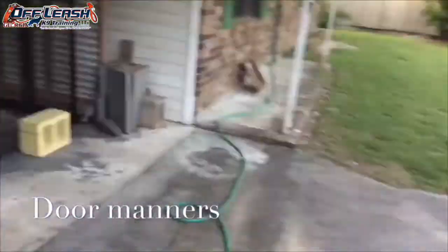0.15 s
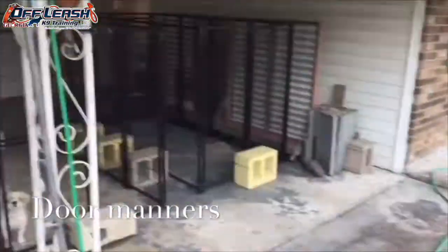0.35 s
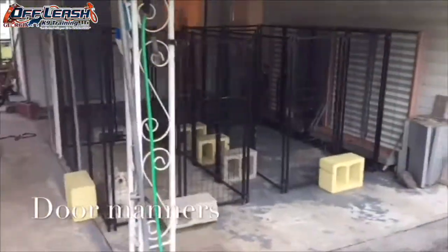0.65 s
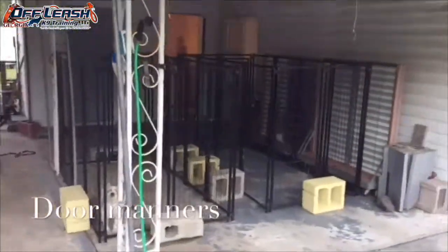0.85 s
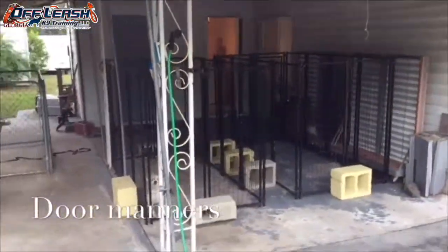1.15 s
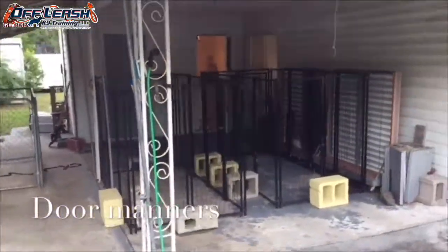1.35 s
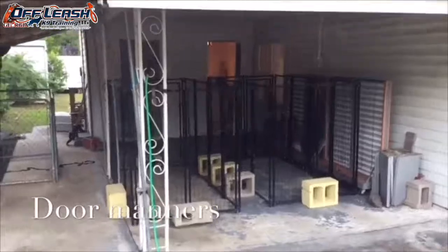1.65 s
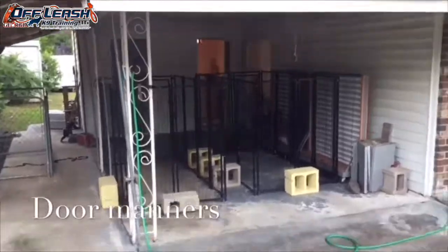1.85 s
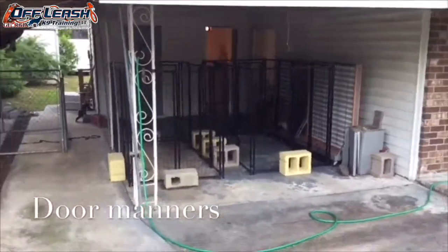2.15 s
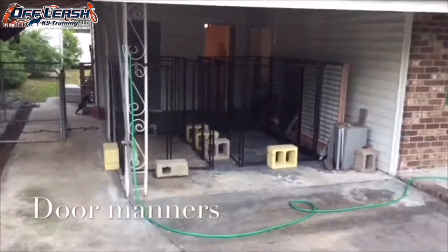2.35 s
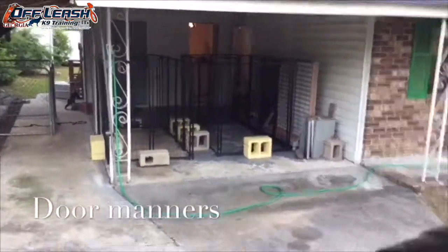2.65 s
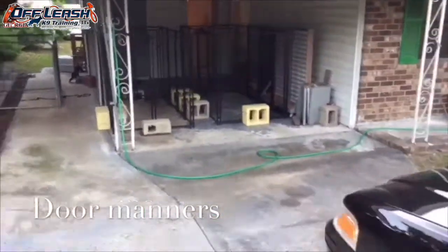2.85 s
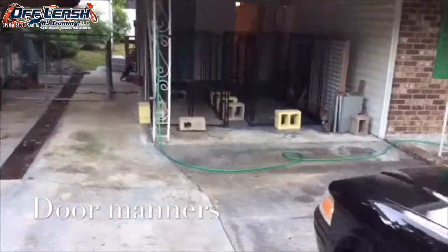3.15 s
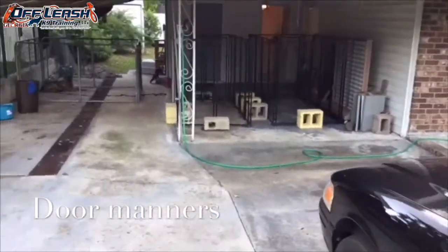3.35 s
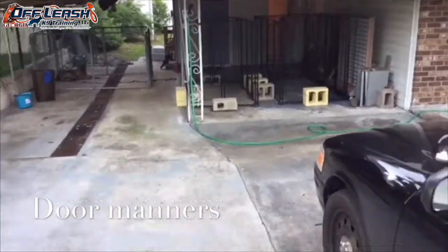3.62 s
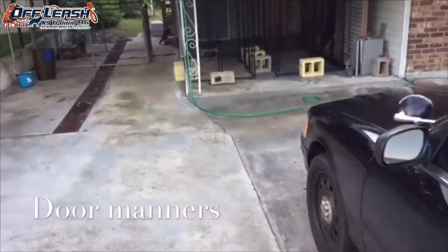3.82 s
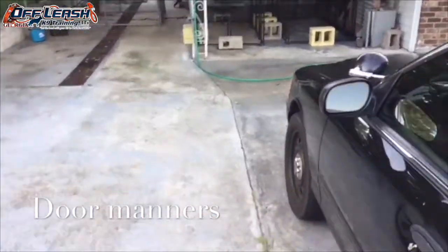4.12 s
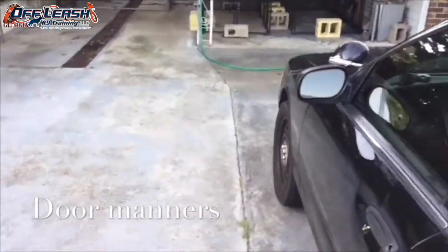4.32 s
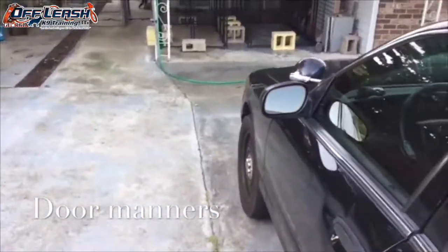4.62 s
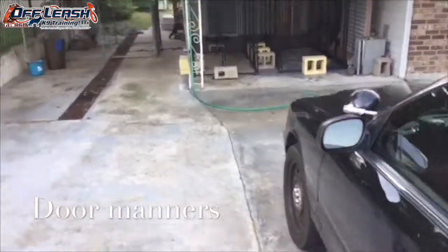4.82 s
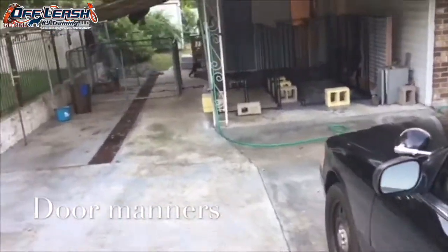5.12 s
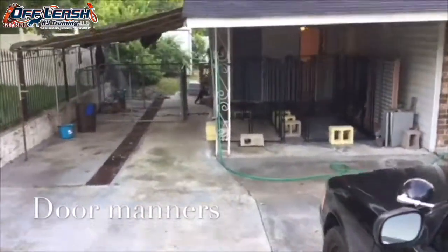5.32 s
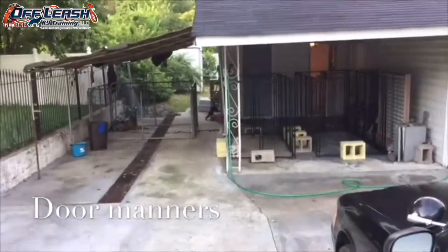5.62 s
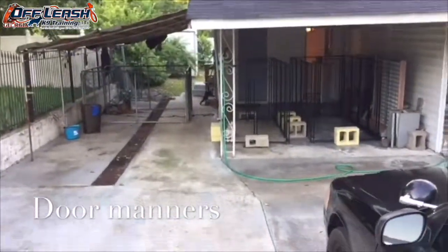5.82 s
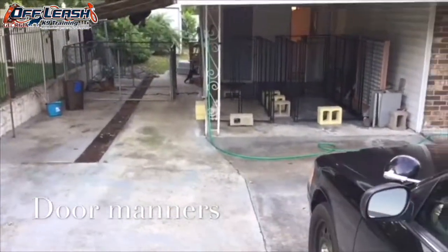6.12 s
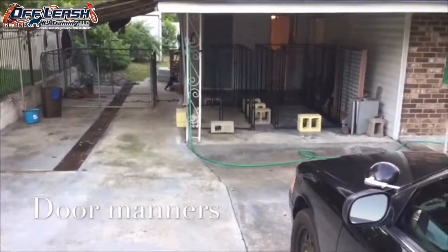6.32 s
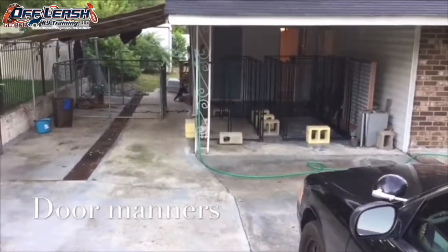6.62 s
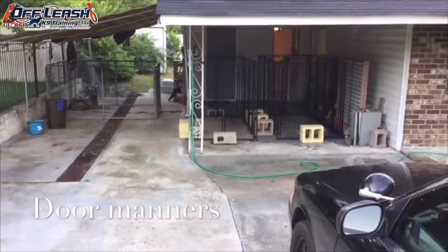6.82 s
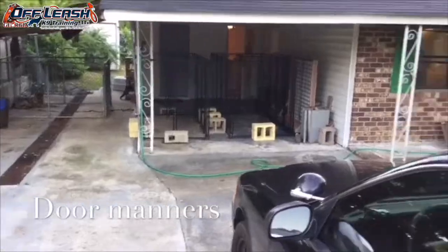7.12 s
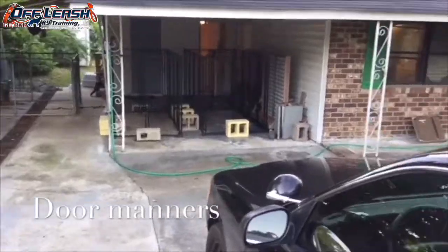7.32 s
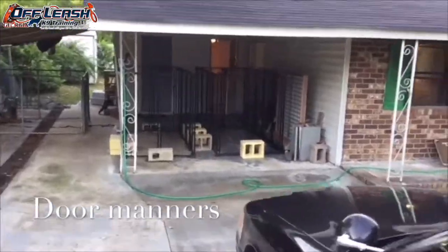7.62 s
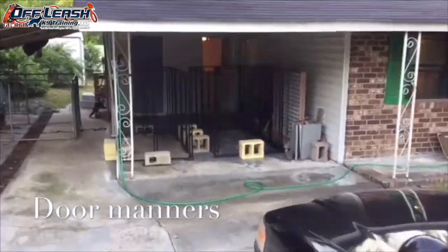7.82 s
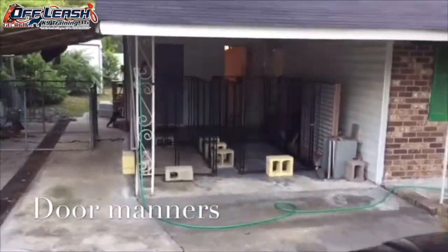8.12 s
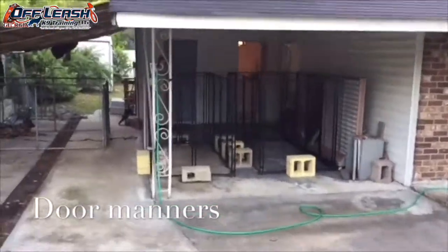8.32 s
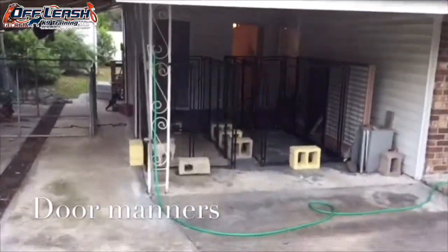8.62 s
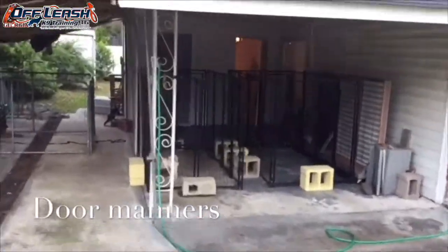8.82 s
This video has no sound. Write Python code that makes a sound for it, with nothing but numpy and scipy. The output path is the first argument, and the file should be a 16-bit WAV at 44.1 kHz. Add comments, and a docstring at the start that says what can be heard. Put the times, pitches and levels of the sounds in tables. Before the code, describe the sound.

Outdoors on a concrete driveway, close handheld microphone. Soft heel thuds, light sole taps and gritty scuffs over a faint low hum and hiss. At about four and a half seconds a car handle clacks, the latch cracks and the door opens with a knock. After a quiet gap of over two seconds the door slams, far louder, booming back off house and carport. Light steps resume.

```python
"""Driveway walk and car door slam

Handheld outdoors: the microphone walks down a concrete driveway to a parked car, over a low far hum.
Heels are sagging low sines with puffs of noise; soles tap and scuff as shaped, grainy noise.
Close by, the handle is pulled, the latch clacks and the door swings open with a knock: noise cracks,
dying modes and low pushes of air. Over two seconds later it is slammed, echoes built from decaying
noise throw the boom back from the yard, and the steps go on."""
import sys
import numpy as np
from scipy import signal
from scipy.fft import rfft, irfft, next_fast_len
from scipy.io import wavfile

SR = 44100
rng = np.random.default_rng(int(sys.argv[2]) if len(sys.argv) > 2 else 0)


def unload_wav(signal):
    """Save mono or channel-first audio to the path in sys.argv[1] as 16-bit WAV at rate SR, clipped to [-1, 1]."""
    wavfile.write(
        sys.argv[1],
        SR,
        np.round(np.clip(np.atleast_2d(signal).T, -1, 1) * 32767).astype(np.int16),
    )


N = 394959

# Spectra below are (frequency [Hz], density [dB per Hz]), relative: noise is brought to rms 1 afterwards.
# T60 is the time to fall 60 dB.

# far background, low hum: spectrum
HUM = [(18, -79.5), (30, -32), (96, -4.5), (188, -4), (337, -6), (372, -9), (400, -11.5), (468, -17),
       (509, -12.5), (697, -31.5), (900, -53), (1170, -38), (1980, -120)]
# hum over time, before a common lift: (time [s], level [dB])
HUM_LEVEL = [(0, -51.5), (.25, -52), (.45, -60.5), (.8, -58), (1.05, -56.5), (1.45, -58), (1.66, -60),
             (1.85, -58), (2.4, -58.5), (2.57, -59), (2.8, -57), (3.3, -61.5), (4.1, -57.5), (4.72, -52),
             (4.9, -52.5), (5.45, -57), (6.4, -54), (7.2, -55), (7.55, -51.5), (8.25, -57), (8.96, -55)]
# background hiss: spectrum
HISS = [(450, -3.5), (750, -0.5), (1050, 0.5), (1400, -3), (1900, -3), (2500, -7), (3500, -8.5), (4600, -9),
        (5000, -6.5), (5500, -10), (7300, -11), (8600, -16), (9600, -14.5), (10400, -6), (11000, -21),
        (12300, -17), (15500, -23.5)]
HISS_DB, HISS_RIPPLE_DB = -66, 2.4  # mean level, unevenness of its spectrum
# middle of the hiss, stirring unevenly: spectrum
STIR = [(300, -13), (700, -1.5), (1200, -5.5), (2000, -4), (2700, -14), (6000, -37)]
STIR_DB, STIR_SWELL_DB = -78, 4.5  # level, depth of each of its two swells
# faint whines: (mean frequency [Hz], mean level [dB])
WHINES = [(2692, -80.5), (2955, -79.5), (3300, -91.5), (3736, -82), (3880, -81.5), (4953, -82), (5820, -87),
          (7250, -89)]
WHINE_FADE_DB, WHINE_WAVER_HZ = 3.2, 34  # rms wander of level and pitch

# far-off peeps and low hoots: (middle [s], half length [s], pitch [Hz], level [dB])
PEEPS = [(.218, 0.012, 6460, -57), (1.277, 0.052, 350, -53), (1.416, 0.18, 345, -55.5),
         (2.083, 0.066, 2100, -65.5), (2.634, 0.055, 3840, -69)]
PEEP_FLUTTER_DB = 3

# ring of a small piece of metal: (frequency [Hz], level [dB], T60 [s])
PING = [(2980, -15, 0.36), (9900, -15, 0.13), (12600, -5, 0.16)]
PING_S, PING_DB = 0.397, -48.5
# small spring flicking in the open door: (frequency [Hz], level [dB], T60 [s])
SPRING = [(2550, -1, 0.023), (3590, 1, 0.057), (4750, 4.5, 0.043), (5830, 2, 0.05), (8150, 4, 0.036),
          (9640, 12, 0.011), (12230, 7, 0.025), (12600, -18, .22)]
# clatter of that spring: spectrum
CLATTER = [(800, -20), (1700, -23), (2400, 6.5), (4000, 1), (6000, 2), (7000, -4), (9500, 4), (12500, -14),
           (15000, -25)]
SPRING_S, SPRING_DB, CLATTER_DB = 5.0463, -42, -33

# soles, sleeves and door seals sliding:
# (middle [s], half length [s], rub level [dB], rub pitch [Hz], grit level [dB])
SCUFFS = [(0.057, 0.083, -64.5, 1480, -88), (0.227, 0.08, -57, 1690, -78), (0.604, 0.037, -57, 1950, -58),
          (0.945, 0.021, -57, 750, -65), (1.37, 0.056, -74, 1300, -79), (2.294, 0.02, -62, 565, -66.5),
          (2.654, 0.05, -61.5, 1600, -66), (2.748, 0.052, -69, 1810, -70), (3.514, 0.061, -69, 910, -67.5),
          (4.451, 0.034, -49.5, 1810, -60), (4.496, 0.04, -36.5, 362, -78), (4.514, 0.0037, -58, 1400, -52),
          (4.573, 0.019, -37, 630, -52), (4.641, 0.012, -50.5, 1420, -69), (4.807, 0.018, -37.5, 205, -52),
          (4.88, 0.017, -36.5, 297, -59), (5.044, 0.0047, -60, 2000, -43.5), (5.248, 0.024, -57, 1400, -60),
          (7.314, 0.0044, -45.5, 280, -43.5), (8.098, 0.11, -64, 650, -71.5),
          (8.683, 0.75, -70.5, 920, -71)]
# grit: spectrum
GRIT = [(600, -12.5), (2000, 3.5), (5000, 0.5), (9000, -8), (15000, -12.5)]
GRIT_SPREAD_DB = 4.2  # how much the grains differ in size

# grit snapping under the sole: (time [s], level [dB])
SNAPS = [(0.584, -37.5), (4.279, -47), (5.265, -45.5), (7.158, -42.5), (7.165, -46.5), (7.626, -53)]
# every snap: spectrum
SNAP = [(500, 1.5), (1100, -11), (1750, 1.5), (2800, -12), (4000, -11), (4500, -18), (5100, -12.5),
        (6500, -28), (12000, -37)]
SNAP_T60 = 0.018  # s

# heels landing on concrete: (time [s], relative level [dB])
HEELS = [(0.686, -36.5), (0.966, -21.5), (1.144, -26.5), (1.905, -30.5), (1.935, -23.5), (2.127, -34),
         (2.335, -23), (2.911, -30), (3.748, -30.5), (3.806, -28), (4.012, -45), (4.954, -34)]
# a harder landing sounds higher: pitch at the reference level, and its rise with level
HEEL_HZ, HEEL_REF_DB, HEEL_OCTAVES_PER_DB = 119.4, -24, 0.1945
HEEL_T60, HEEL_THIN_HZ = 0.035, 60.4  # s; bass thins out below
# rough puff of heel rubber: spectrum
PUFF = [(80, -41), (200, 7), (400, -1), (600, -15), (1200, -31.5), (3000, -45)]
PUFF_DB, PUFF_T60 = -18, 0.073  # against the level in HEELS; s
# weight settling onto the foot: delay (s), pitch, level against HEELS, T60 (s)
SETTLE_S, SETTLE_HZ, SETTLE_DB, SETTLE_T60 = 0.0149, 93, -8.5, 0.078

# clearer taps of soles on concrete:
# (time [s], knock level [dB], click level [dB], knock pitch [Hz], T60 [s])
TAPS = [(0.025, -41, -42, 704, 0.028), (0.355, -51.5, -49, 606, 0.037), (0.935, -40, -64, 420, 0.031),
        (1.229, -50, -50, 550, 0.031), (1.371, -51, -51.5, 590, 0.055), (1.83, -47.5, -67, 438, 0.06),
        (1.845, -45, -57, 398, 0.059), (2.289, -54, -56, 560, 0.14), (2.386, -46, -57, 400, 0.07),
        (2.6308, -43, -47.5, 615, 0.11), (2.647, -37.5, -54, 516, 0.078), (2.746, -51, -54, 497, 0.032),
        (2.765, -42.5, -68, 670, 0.02), (3.062, -42, -56, 540, 0.074), (3.101, -48, -56, 514, 0.045),
        (3.189, -44.5, -53, 450, 0.032), (3.433, -57, -58, 496, 0.057), (3.510, -45.5, -57, 470, 0.059),
        (3.53, -57, -58, 520, 0.052), (4.012, -33, -56, 485, 0.032), (4.046, -39, -58, 610, 0.031),
        (5.119, -43, -61, 380, 0.11), (5.263, -41, -50, 502, 0.058), (7.202, -38.5, -49, 566, 0.043),
        (7.714, -42, -51.5, 566, 0.037), (7.793, -61, -52.5, 600, .035), (8.018, -45, -62, 554, 0.025),
        (8.098, -42.5, -63, 640, 0.041), (8.137, -43, -52, 546, 0.04), (8.489, -35.5, -50, 526, 0.036),
        (8.639, -50, -50.5, 550, 0.032), (8.702, -49, -46, 560, 0.029), (8.718, -44.5, -66, 593, 0.029)]
# click of a sole: spectrum
SOLE = [(400, -8), (900, 3.5), (1600, 2.5), (2100, -5), (2600, -15), (4500, -30), (8000, -39), (15000, -54)]
CRUNCH_DB = 3  # unevenness of the grains in a tap
# one step clopping twice, hollow: (time [s], level [dB], pitch [Hz], T60 [s])
CLOPS = [(2.632, -25.5, 510, 0.048), (2.6475, -25.5, 460, .028)]
# stretches of walking: (start [s], end [s])
WALKS = [(0, 4.4), (7.7, 8.9)]
# faint taps falling by chance: rate, mean levels, largest departure either way
FAINT_PER_S, FAINT_KNOCK_DB, FAINT_CLICK_DB, FAINT_SPREAD_DB = 5, -56, -67, 3
FAINT_HZ, FAINT_T60 = 485, 0.14

# door handle hitting its stops: (time [s], level [dB])
CLACKS = [(4.5145, -26.5), (4.523, -37), (4.5601, -32)]
# ring of the handle: (frequency [Hz], level [dB], T60 [s])
HANDLE = [(763, -7.5, 0.043), (1100, -6, 0.041), (1840, -2, 0.046), (2154, -5, 0.055), (2430, -7.5, 0.049),
          (3580, -12.5, 0.049)]
BUZZ_DB = 4

# steel of handle and latch striking, from the pull through the opening to the slam:
# (time [s], crack level [dB], treble level [dB], T60 [s], thin below [Hz], dull above [Hz], rods level [dB])
LATCH = [ (4.45, -52, -47, 0.033, 900, 5000, -78), (4.464, -41, -45.5, 0.038, 696, 2500, -73),
         (4.5133, -29, -34, 0.053, 400, 3500, -50), (4.54, -41, -52, .05, 700, 3500, -62),
         (4.5585, -28, -52, 0.024, 700, 1700, -56), (4.571, -34, -46, .015, 500, 2500, -65),
         (4.578, -32.5, -36, 0.04, 2190, 9000, -56), (4.785, -41.5, -36, 0.038, 1400, 5000, -57),
         (4.8001, -43, -38, 0.057, 1200, 8000, -67), (4.808, -35, -36, 0.041, 1800, 8000, -64),
         (4.8128, -13, -35, 0.019, 347, 7000, -55), (4.8142, -11, -26, 0.012, 2420, 9000, -58),
         (4.878, -45, -73, .04, 1500, 7000, -63), (4.919, -48, -50, 0.024, 1400, 7000, -74),
         (5.046, -30, -32, 0.0076, 600, 4000, -64), (7.3185, -17, -21, 0.12, 400, 3500, -33.5),
         (7.3241, -19, -24, 0.025, 400, 5000, -40), (7.3280, -5.5, -20.5, 0.031, 250, 2600, -29.5),
         (7.3455, -34, -26, 0.053, 500, 6000, -52), (7.362, -31.5, -39.5, 0.2, 400, 4000, -54)]
# body of a latch crack: spectrum
STEEL = [(200, -7), (700, 5.5), (1300, -3), (2100, -2), (2800, -6), (3600, -7.5), (4800, -20.5),
         (7000, -30), (12000, -54)]
# treble of a latch crack: spectrum
STEEL_TREBLE = [(2000, -35), (4000, 1), (5600, 3), (9000, -0.5), (11500, -2), (15000, -2.5)]
# ring of latch and rods: (frequency [Hz], mean level [dB], T60 [s])
RODS = [(1070, -4.5, 0.13), (1220, -1.5, 0.129), (1310, -5, 0.156), (1430, -2, 0.15), (1501, 6.5, 0.12),
        (1665, 3, 0.13), (1710, -2, 0.14), (1870, -3.5, 0.086), (1980, -1, 0.15), (2167, -0.5, 0.18),
        (2380, -1.5, 0.12), (2930, 4.5, 0.12), (3450, -16, 0.1), (3710, -3, 0.12), (4680, -14, 0.18)]
RODS_SPREAD_DB, TREBLE_RIPPLE_DB = 1.5, 3  # variation per strike, unevenness of the treble
CRACK_RISE_S, RATTLE_DB, RATTLE_T60 = 0.0015, -31, 0.15  # rise, then the lingering rattle
CHATTER_PER_S, CHATTER_DB = 650, 2.5

# blows on the door: (time [s], panel level [dB], trim level [dB], trim T60 [s], dull above [Hz])
BLOWS = [(4.5139, -23.5, -24.5, 0.16, 400), (4.5246, -24, -23, 0.067, 450), (4.56, -39, -40, 0.051, 1500),
         (4.569, -33.5, -40, .04, 1200), (4.8150, -6.5, -16, 0.11, 806), (4.882, -38, -32, .04, 500),
         (7.319, -44, -25, 0.28, 3000), (7.328, -12.5, -10.5, 0.11, 2200), (7.381, -30, -31, 0.22, 700)]
# door panel modes: (frequency [Hz], level [dB], nominal T60 [s], split into a short and a long decay)
PANEL = [(193.4, -2, 0.095), (243.5, 4, 0.097), (322.5, -13.5, 0.11), (377, -5, 0.078), (416, 4, 0.078),
         (477.3, -6, 0.13), (542, -9.5, 0.055), (633, -7, 0.11), (694, -21.5, 0.26), (738, -19, 0.097),
         (890, -12, 0.086), (1062, -10.5, 0.077), (1195, -23, 0.039), (1495, -18, 0.075)]
# loose trim and glass: spectrum
TRIM = [(60, -15), (150, -5), (310, 8), (560, 2.5), (900, -9), (2000, -14), (3500, -18), (7000, -11.5),
        (15000, -36.5)]
TRIM_RIPPLE_DB = 4
# whole door heaving and pushing the cabin air: (time [s], level [dB], pitch [Hz], T60 [s])
BOOMS = [(4.5139, -11.5, 211.5, 0.057), (4.517, -20, 454, 0.031), (4.5245, -22, 198, 0.029),
         (4.8158, -17, 229, 0.054), (4.8165, -10.5, 457, 0.044), (4.838, -30, 147, .06),
         (7.329, -6, 317.5, 0.057), (7.3276, -6.5, 515, 0.036), (7.3316, 0, 180, 0.028),
         (7.337, -6, 88, 0.096), (7.3791, -11, 104, 0.069)]

# decay of the echo off house and carport: (frequency [Hz], T60 [s])
YARD_T60 = [(80, 0.85), (280, 0.5), (600, 0.5), (2000, 2), (12000, 3)]
# strength of that echo: (frequency [Hz], level [dB])
YARD_DB = [(80, -21.5), (160, -11.5), (290, -7.5), (450, -18.5), (700, -28), (2500, -23), (12000, -25.5)]
# answer of a far wall: spectrum
FAR = [(60, -30), (110, -10.5), (180, -13), (280, 9), (370, -3), (450, -14), (600, -21), (2000, -52.5)]
FAR_S, FAR_SPREAD_S, FAR_DB = 0.22, 0.077, -44  # delay, blur, level
# share of the door's sound that reaches the yard before and from SLAM_FROM_S
OPENING_SHARE, SLAM_SHARE, SLAM_FROM_S = 0.091, 0.98, 7
EDGE_HZ = 15900  # upper edge of the sound


def amp(db):
    """Decibels to gain."""
    return 10 ** (np.asarray(db) / 20)


def unit(x):
    """Scales to rms 1."""
    return x / np.sqrt(np.mean(x ** 2) + 1e-20)


def read(points, hz):
    """Reads a table on a log-frequency axis."""
    f, value = np.transpose(points)
    return np.interp(np.log(hz + 1), np.log(f + 1), value)


def add(mix, s, sound):
    """Mixes a sound in at second s, cropped to the ends of the mix."""
    start = round(s * SR)
    sound = sound[max(-start, 0):]
    part = mix[max(start, 0):][:len(sound)]
    part += sound[:len(part)]


def fade(t, t60):
    """Exponential decay of 60 dB in t60 seconds, never faster than 3 ms."""
    return np.exp(-np.log(1000) * t / np.maximum(t60, .003))


def colour(x, points, dull_hz=SR, ripple_db=0):
    """Gives x a spectrum, dull above dull_hz and randomly uneven in fine steps of frequency, at rms 1."""
    size = next_fast_len(len(x), True)
    hz = np.fft.rfftfreq(size, 1 / SR)
    grid = np.arange(0, SR, 45)
    ripple = ripple_db * np.interp(hz, grid, rng.standard_normal(len(grid)))
    ripple *= hz / (hz + 800)  # the bass stays smooth
    gain = amp(read(points, hz) + ripple) / np.hypot(1, hz / dull_hz)
    return unit(irfft(rfft(x, size) * gain, size)[:len(x)])


def noise(points, size=SR // 2, dull_hz=SR, ripple_db=0):
    """Coloured noise at rms 1."""
    return colour(rng.standard_normal(size), points, dull_hz, ripple_db)


def struck(x, envelope):
    """Shapes x with an envelope; the blow keeps the envelope's energy."""
    return unit(x * envelope) * np.sqrt(np.mean(envelope ** 2))


def drift(per_s, size=N):
    """Slow random wander at rms 1, through per_s random points a second."""
    knots = rng.standard_normal(size // 40)
    return unit(np.interp(np.arange(size) * per_s / SR, np.arange(len(knots)), knots))


def thud(hz, t60, rise, sag):
    """A soft push: a few low cycles whose pitch sags to hz as the contact spreads."""
    t = np.arange(SR // 2) / SR
    turns = hz * (t + sag * 0.0037 * (1 - np.exp(-t / 0.0016)))
    return np.sin(2 * np.pi * turns) * (1 - np.exp(-(t / rise) ** 2)) * fade(t, t60)


def ring(modes):
    """Dying sines of an object struck once, alternating in sign."""
    t = np.arange(SR // 2) / SR
    return sum((-1) ** k * amp(db) * np.sin(2 * np.pi * hz * t) * fade(t, t60)
               for k, (hz, db, t60) in enumerate(modes))


def background():
    """A low hum whose bands swell apart, hiss that stirs in the middle, and whines that come and go."""
    t = np.arange(N) / SR
    low = noise(HUM + [(1500, -68.5), (4000, -100)], size=N)
    deep = signal.sosfiltfilt(signal.butter(2, 200, fs=SR, output="sos"), low)
    upper_swell = amp(0.53 * drift(7.6) + 2.0 * drift(30) - 0.4)
    hum = 0.86 * deep * amp(3.0 * drift(25)) + (low - deep) * upper_swell
    hum *= amp(np.interp(t, *np.transpose(HUM_LEVEL)) + 1.8)
    hiss = noise(HISS, size=N, ripple_db=HISS_RIPPLE_DB) * amp(HISS_DB + 1.2 * drift(3.4))
    stir = noise(STIR, size=N) * amp(STIR_DB + STIR_SWELL_DB * (drift(8.1) + drift(40)))
    whines = np.zeros(N)
    for hz, db in WHINES:
        level = amp(db + WHINE_FADE_DB * drift(26))
        turns = np.cumsum(hz + WHINE_WAVER_HZ * drift(120)) / SR
        whines += level * np.sin(2 * np.pi * turns)
    return hum + hiss + stir + whines


def peeps():
    """Short, hoarse whistles from far off: sines that waver in pitch and strength."""
    out, t = np.zeros(N), np.arange(-SR // 2, SR // 2) / SR
    for s, half, hz, db in PEEPS:
        turns = np.cumsum(hz * (1 + 0.028 * drift(500, size=len(t)))) / SR
        flutter = unit(amp(PEEP_FLUTTER_DB * drift(44.5, size=len(t))))
        swell = np.exp(-(t / half) ** 2)
        add(out, s + t[0], amp(db) * flutter * swell * np.sin(2 * np.pi * turns))
    return out


def trinkets():
    """A thin ping of metal, and a spring in the open door that rings and clatters at once."""
    out, t = np.zeros(N), np.arange(SR // 2) / SR
    add(out, PING_S, amp(PING_DB) * ring(PING))
    envelope = fade(t, 0.039) + amp(-20.5) * fade(t, 0.29)
    envelope = envelope * amp(2.2 * drift(870, size=len(t)))
    clatter = struck(noise(CLATTER, ripple_db=-2.0), envelope)
    add(out, SPRING_S, amp(SPRING_DB) * ring(SPRING) + amp(CLATTER_DB) * clatter)
    return out


def scuffs():
    """Sliding contact: a hollow rub, and grains of sand of very uneven size."""
    out, t = np.zeros(N), np.arange(-SR // 3, SR // 3) / SR
    for s, half, rub_db, hz, grit_db in SCUFFS:
        sizes = amp(GRIT_SPREAD_DB * drift(700, size=len(t)))
        grains = colour(rng.standard_normal(len(t)) * sizes, GRIT, ripple_db=-3.5)
        hollow = [(hz / 5, -16), (hz / 3.46, -5), (hz, 0), (hz * 1.57, -14), (hz * 4, -34), (hz * 15, -54)]
        rub = noise(hollow, size=len(t), ripple_db=0.5) * amp(2.3 * drift(191.5, size=len(t)))
        slide = (amp(rub_db) * rub + amp(grit_db) * grains) * np.exp(-(t / half) ** 2)
        add(out, s + t[0], slide)
    return out


def snaps():
    """Grit breaking under a sole: one very short, dry click of noise each."""
    out, t = np.zeros(N), np.arange(SR // 8) / SR
    for s, db in SNAPS:
        snap = struck(noise(SNAP, size=len(t), ripple_db=1), fade(t, SNAP_T60))
        add(out, s, amp(db) * snap)
    return out


def heels():
    """Each heel thuds, higher when it lands harder, with a puff of rubber; then the weight settles."""
    out, t = np.zeros(N), np.arange(SR // 4) / SR
    for s, db in HEELS:
        hz = HEEL_HZ * 2 ** (HEEL_OCTAVES_PER_DB * (db - HEEL_REF_DB))
        add(out, s, amp(db + 6.5) * thud(hz, HEEL_T60, rise=0.0032, sag=0.53))
        envelope = fade(t, PUFF_T60) * (1 - np.exp(-t / 0.0041))
        puff = struck(noise(PUFF, size=len(t), ripple_db=4), envelope)
        add(out, s, amp(db + PUFF_DB) * puff)
        settle = thud(SETTLE_HZ, SETTLE_T60, rise=0.0061, sag=0.08)
        add(out, s + SETTLE_S, amp(db + SETTLE_DB) * settle)
    return signal.sosfilt(signal.butter(1, HEEL_THIN_HZ, "high", fs=SR, output="sos"), out)


def tap(knock_db, click_db, hz, t60):
    """A sole taps: a short hollow knock of noise with a grainy crunch on top."""
    size = SR // 8
    t = np.arange(size) / SR
    hollow = [(hz / 6, -22), (hz / 1.28, -8), (hz, 0), (hz * 0.99, -7), (hz * 1.96, -28), (hz * 10, -70)]
    soft = 1 - np.exp(-(t / 0.0011) ** 2)  # rubber takes a moment to load
    knock = struck(noise(hollow, size=size, ripple_db=6.5), fade(t, t60) * soft)
    grains = fade(t, t60) * soft * amp(CRUNCH_DB * drift(380, size=size))
    crunch = colour(grains * rng.standard_normal(size), SOLE, ripple_db=2.5)
    crunch *= np.sqrt(np.mean(grains ** 2))
    return amp(knock_db) * knock + amp(click_db) * crunch


def footsteps():
    """Heels, the clearer sole taps, hollow clops, and faint taps scattered over each stretch of walking."""
    out = heels()
    for s, *sound in TAPS:
        add(out, s, tap(*sound))
    for s, db, hz, t60 in CLOPS:
        add(out, s, amp(db) * thud(hz, t60, rise=0.0036, sag=0.057))
    for start, end in WALKS:
        count = round(FAINT_PER_S * (end - start))
        for place, size in rng.random((count, 2)):
            db = FAINT_SPREAD_DB * (2 * size - 1)
            faint = tap(FAINT_KNOCK_DB + db, FAINT_CLICK_DB + db, FAINT_HZ, FAINT_T60)
            add(out, start + place * (end - start), faint)
    return out


def handle():
    """The handle and its lever clack against their stops, with a short, buzzing ring."""
    out = np.zeros(N)
    for s, db in CLACKS:
        clack = ring(HANDLE)
        buzz = amp(BUZZ_DB * drift(CHATTER_PER_S, size=len(clack)))
        add(out, s, amp(db) * clack * buzz)
    return out


def latch():
    """Steel on steel: a gritty, chattering crack with a ring of the rods, different at each strike."""
    out, t = np.zeros(N), np.arange(SR // 2) / SR
    for s, db, treble_db, t60, thin_hz, dull_hz, rods_db in LATCH:
        chatter = amp(CHATTER_DB * drift(CHATTER_PER_S, size=len(t)))
        decay = fade(t, t60) + amp(RATTLE_DB) * fade(t, RATTLE_T60)
        envelope = decay * (1 - np.exp(-t / CRACK_RISE_S)) * chatter
        thin = signal.butter(2, thin_hz, "high", fs=SR, output="sos")
        steel = signal.sosfilt(thin, noise(STEEL, dull_hz=dull_hz, ripple_db=-1.5))
        crack = struck(steel, envelope)
        treble = struck(noise(STEEL_TREBLE, ripple_db=TREBLE_RIPPLE_DB), envelope)
        rods = [(hz, mode_db + RODS_SPREAD_DB * rng.standard_normal(), ring_t60)
                for hz, mode_db, ring_t60 in RODS]
        add(out, s, amp(db) * crack + amp(treble_db) * treble + amp(rods_db) * ring(rods))
    return out


def door():
    """Blows ring the panel's modes and shake the trim; the heaving door pumps the cabin air."""
    out, t = np.zeros(N), np.arange(SR // 2) / SR
    for s, panel_db, trim_db, trim_t60, dull_hz in BLOWS:
        panel = np.zeros(len(t))
        for hz, db, t60 in PANEL:
            build_up = 1 - np.exp(-t * hz / 2.0)  # modes take a few cycles to build up
            # the seals damp them, leaving a weak long ring
            decay = fade(t, 0.63 * t60) + amp(-15.0) * fade(t, 1.98 * t60)
            level = amp(db) / np.hypot(1, hz / dull_hz)
            panel += level * np.sin(2 * np.pi * hz * t) * build_up * decay
        envelope = fade(t, trim_t60) * (1 - np.exp(-t / 0.0011))
        trim = struck(noise(TRIM, dull_hz=dull_hz, ripple_db=TRIM_RIPPLE_DB), envelope)
        add(out, s, amp(trim_db) * trim - amp(panel_db) * panel)
    for s, db, hz, t60 in BOOMS:
        add(out, s, -amp(db) * thud(hz, t60, rise=0.3 / hz, sag=0.041))
    return out


def yard(x):
    """Scattered echoes that build up over some milliseconds, then a low, blurred answer from a far wall."""
    hz, t, z = signal.stft(rng.standard_normal(SR), SR, nperseg=512)
    t60 = read(YARD_T60, hz)[:, None]
    build_up = 1 - np.exp(-(t / 0.012) ** 2)
    z = z * fade(t, t60) * build_up * amp(read(YARD_DB, hz))[:, None]
    z = z * np.sqrt(2 * np.log(1000) / (t60 * SR))  # evens out the energy of long and short decays
    tail = signal.istft(z, SR, nperseg=512)[1]
    after = np.arange(len(tail)) / SR - FAR_S
    far = noise(FAR, size=len(tail)) * np.exp(-(after / FAR_SPREAD_S) ** 2)
    return signal.fftconvolve(x, tail + amp(FAR_DB) * far / np.linalg.norm(far))[:N]


def scene():
    """All near sources directly, with the yard's echo and the open air behind them."""
    air, body = background(), door()
    share = np.where(np.arange(N) / SR < SLAM_FROM_S, OPENING_SHARE, SLAM_SHARE)
    small = scuffs() + latch() + handle() + trinkets() + peeps() + snaps() + footsteps()
    echo = yard(share * body + 0.2 * small)
    return (body + small + echo + air)[None]


def record(dry):
    """The microphone sheds deep bass and rounds off the loudest peaks; the top is cut off above EDGE_HZ."""
    thin = signal.sosfilt(signal.butter(4, 54, "high", fs=SR, output="sos"), dry)
    rounded = 1.05 * np.tanh(thin / 1.05)
    low_pass = signal.firwin(511, EDGE_HZ, window=("kaiser", 9), fs=SR)
    return signal.oaconvolve(rounded, low_pass[None], "same")


dry = scene()
out = record(dry)
unload_wav(out)
```